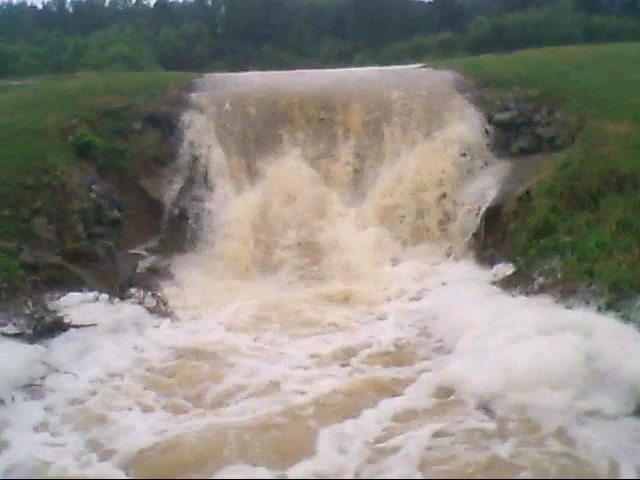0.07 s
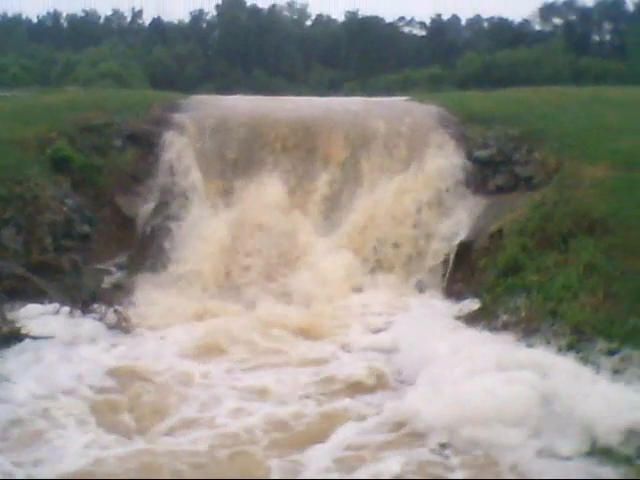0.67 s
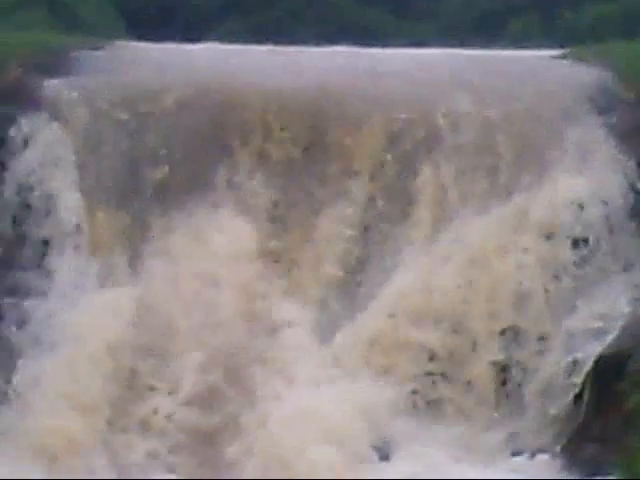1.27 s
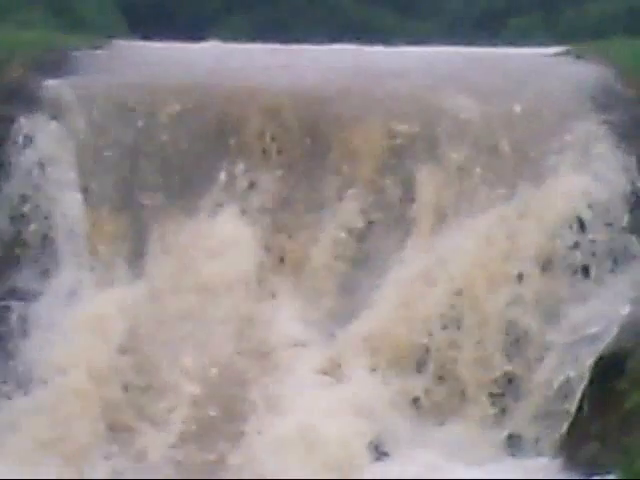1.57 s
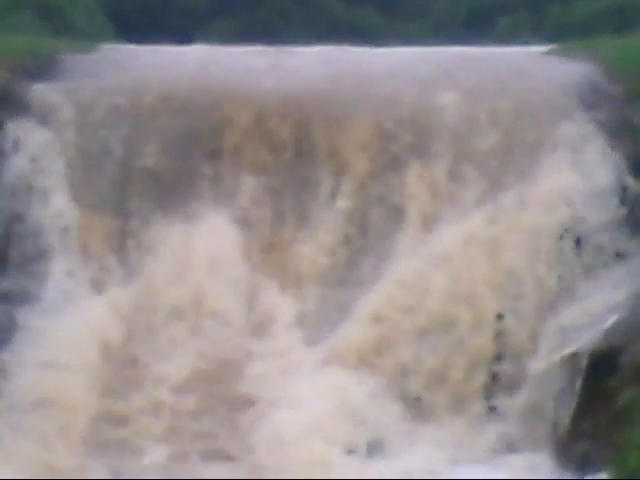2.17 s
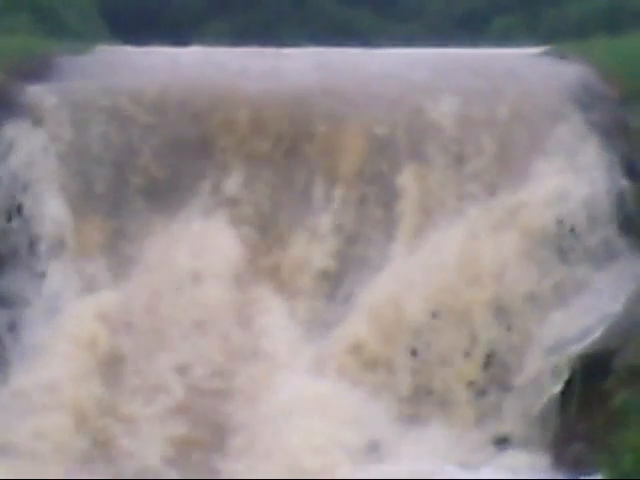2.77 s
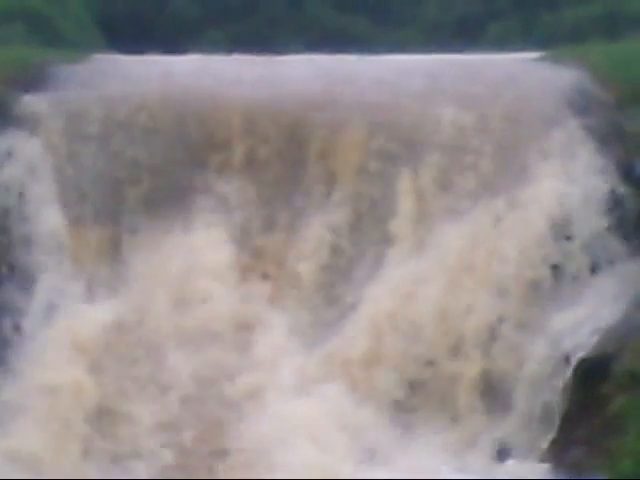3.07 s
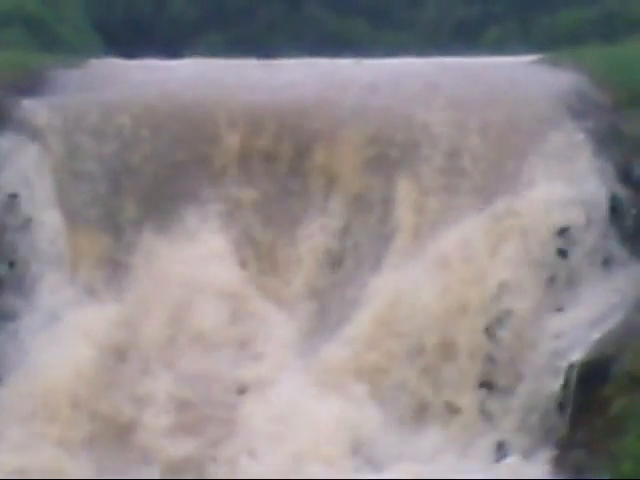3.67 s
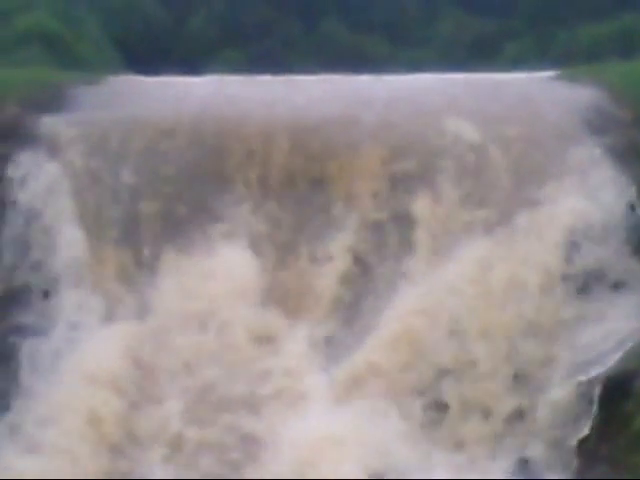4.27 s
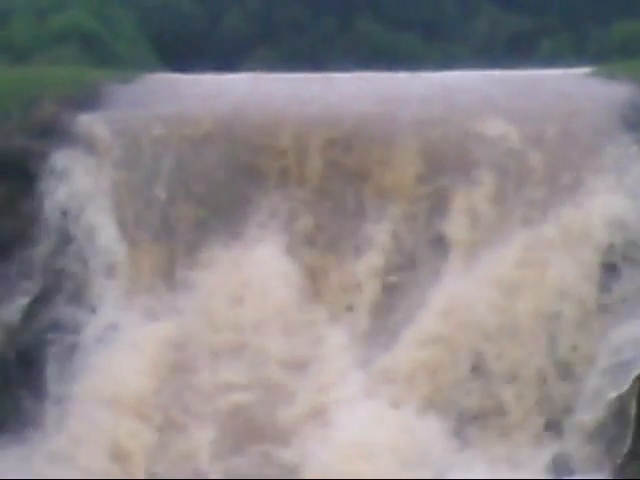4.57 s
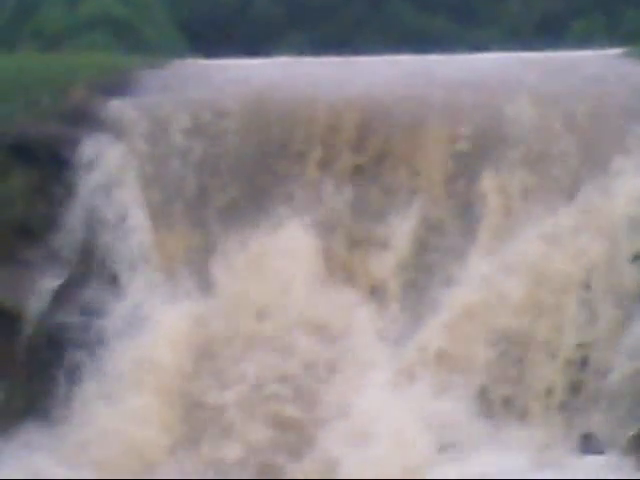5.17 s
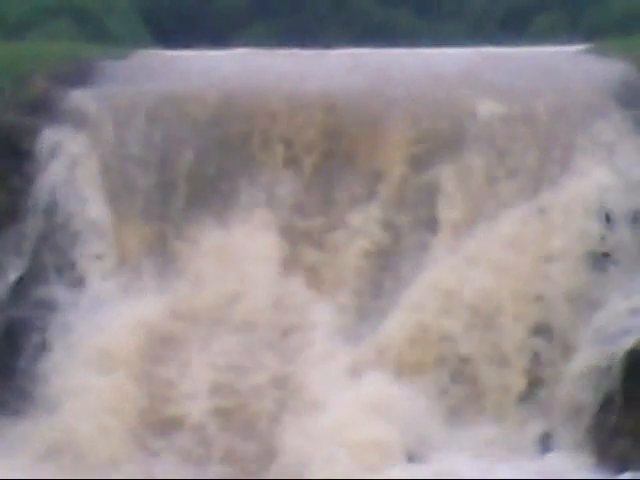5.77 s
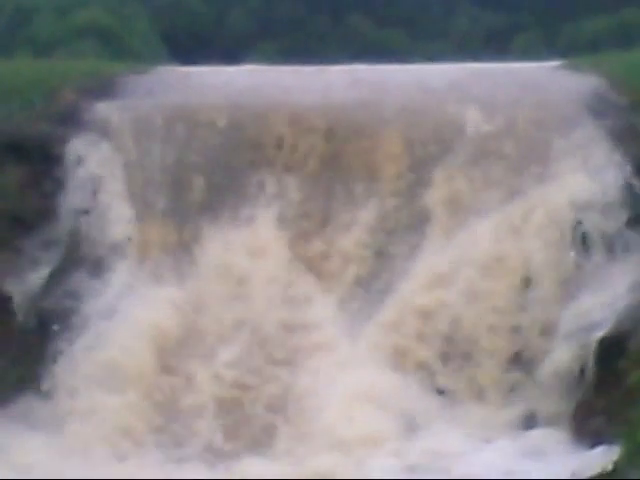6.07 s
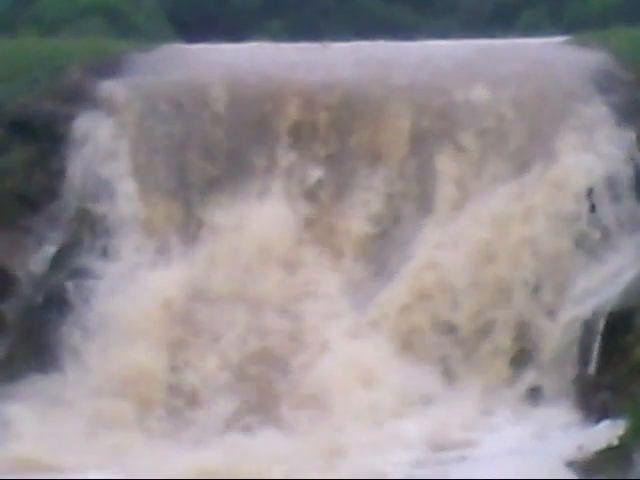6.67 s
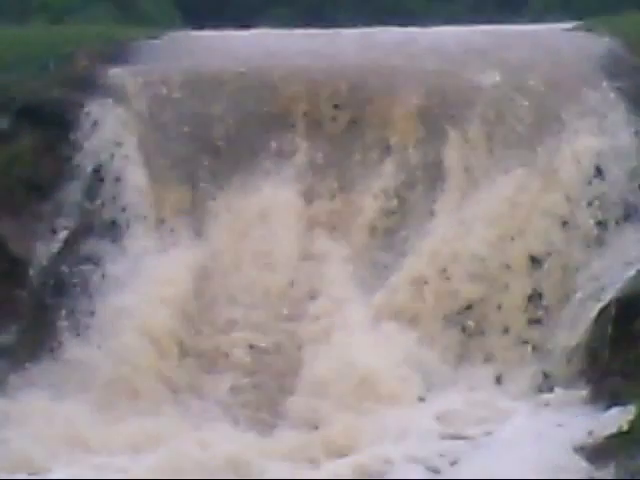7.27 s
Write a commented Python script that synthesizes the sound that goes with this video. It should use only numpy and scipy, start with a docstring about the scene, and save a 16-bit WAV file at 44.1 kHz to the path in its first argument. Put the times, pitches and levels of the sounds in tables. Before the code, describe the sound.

Floodwater crashes into a pool with a gritty roar, then drops into a deep, slowed-down rumble with soft gulps.

```python
"""Floodwater over a ledge

Muddy water crashes into a pool: countless impacts superpose into a roar, with a few surges, gulps
and ticks. The roar is heard at natural speed, then, after a second of overlap, at quarter speed as a
deep rumble. Both are coarsely sampled; the steps of the wave add a grit that follows every surge."""
import sys
import numpy as np
from scipy import signal
from scipy.fft import rfft, irfft
from scipy.io import wavfile
from scipy.ndimage import uniform_filter1d

SR = 44100
rng = np.random.default_rng(int(sys.argv[2]) if len(sys.argv) > 2 else 0)


def master_out(mix):
    """Clip the mix to full scale and print it as 16-bit PCM to the path in sys.argv[1]."""
    frames = np.transpose(np.atleast_2d(mix))
    ceiling = np.clip(frames, -1, 1)
    pcm = np.round(ceiling * 32767).astype(np.int16)
    wavfile.write(sys.argv[1], SR, pcm)


N = 331191
TIME = np.arange(N) / SR
RUMBLE_START_S, ROAR_END_S = 1.128, 2.165


def from_db(db):
    """Amplitude ratio: a factor of ten for every 20 dB."""
    return 10 ** (np.asarray(db) / 20)


def unit_rms(x):
    """Normalisation to unit mean power."""
    return x / np.sqrt(np.mean(x ** 2) + 1e-20)


def envelope(rows):
    """Amplitude envelope, linear in decibels between (time [s], level [dB]) points."""
    return from_db(np.interp(TIME, *np.transpose(rows)))


def colour(x, spectrum):
    """Spectral shaping: 6 dB per octave roll-off below the first point, a stop band above the last."""
    hz, db = np.transpose(spectrum)
    bin_hz = np.maximum(np.arange(N // 2 + 1) * SR / N, 1e-3)
    gain = from_db(np.interp(np.log(bin_hz), np.log(hz), db, right=-90))
    bass_rolloff = np.minimum(bin_hz / hz[0], 1)
    return irfft(rfft(x) * gain * bass_rolloff, N)


def drift(corner_hz):
    """Two-pole low-pass filtering turns white noise into a slow wander of unit power."""
    hop, settling = 40, 2000
    pole = np.exp(-2 * np.pi * corner_hz * hop / SR)
    noise = rng.standard_normal(N // hop + settling + 2)
    slow = signal.lfilter([1], [1, -2 * pole, pole * pole], noise)[settling:]
    return np.interp(np.arange(N) / hop, np.arange(len(slow)), unit_rms(slow))


def crashing_water(spectrum, impacts_per_s, churn_db, churn_hz, steady_s, size_spread_db=2.0):
    """Shot noise: random impacts, swelling in clumps, merge into a rush held at even mean power."""
    hits = rng.random(N) < impacts_per_s / SR
    signs = rng.choice([-1, 1], N)
    sizes = from_db(size_spread_db * np.clip(rng.standard_normal(N), -2, 2))
    churn = from_db(churn_db * drift(churn_hz))
    water = colour(hits * signs * sizes * churn, spectrum)
    window = int(steady_s * SR)
    power = uniform_filter1d(uniform_filter1d(water ** 2, window), window)
    return water / np.sqrt(power + 1e-12)


def sample_and_hold(x, slowdown=1, natural_rate_hz=8000):
    """Zero-order hold: a staircase wave adds gritty spectral images; slowing widens its steps."""
    natural_sample = np.arange(N) // slowdown
    step = np.floor(natural_sample * natural_rate_hz / SR)
    return np.interp(step * slowdown * SR / natural_rate_hz, np.arange(N), x)


# Spectrum of the roar before its glide: (frequency [Hz], relative density [dB])
ROAR_SPECTRUM = [(40, -32), (109, -20), (190, -10.0), (326, -13.5), (474, -10.5), (695, -0.5), (845, -0.2),
                 (966, -9), (1177, -1), (1464, -10.5), (2008, -20), (2925, -16), (3661, -18.5),
                 (4000, -30.5)]
# Upward slide of that spectrum: (time [s], frequency ratio [1])
ROAR_FREQUENCY_RATIO = [(0, 0.93), (.3, 0.97), (2.16, 1.04)]
# Strength of the fall at natural speed: (time [s], level [dB])
ROAR_LEVEL = [(0, -26.7), (.8, -25.5), (2.16, -25.5)]


def roar():
    """Superposed impacts make a bright rush; time scaling slides its spectrum upward a little."""
    water = crashing_water(ROAR_SPECTRUM, impacts_per_s=20000, churn_db=1.0, churn_hz=38, steady_s=0.073)
    position = np.cumsum(np.interp(TIME, *np.transpose(ROAR_FREQUENCY_RATIO)))
    gliding = np.interp(position, np.arange(N), water)
    return sample_and_hold(gliding * envelope(ROAR_LEVEL)) * (TIME < ROAR_END_S)


# Spectrum of the hiss under the roar: (frequency [Hz], relative density [dB])
HISS_SPECTRUM = [(200, -14), (1500, 3), (5000, -5), (16000, -16)]
# Spectrum of the noise floor: (frequency [Hz], relative density [dB])
FLOOR_SPECTRUM = [(2000, 0), (5000, -1), (16000, -9)]


def hiss(under_roar_db=-49.5, floor_db=-53):
    """Filtered Gaussian noise: one faint hiss ends with the roar, a brighter one lasts throughout."""
    under_roar = from_db(under_roar_db) * unit_rms(colour(rng.standard_normal(N), HISS_SPECTRUM))
    floor = from_db(floor_db) * unit_rms(colour(rng.standard_normal(N), FLOOR_SPECTRUM))
    return under_roar * (TIME < ROAR_END_S) + floor


# Sharp ticks in the water noise: (time [s], peak level [dB], width [s])
TICK_PULSES = [(0.0847, -14.5, 0.0002), (.151, -12, .00016), (.985, -18, 0.00017), (3.3597, -16, 0.00073),
               (3.6962, -13, 0.00094), (4.0256, -10, 0.00029), (4.289, -14, 0.00086),
               (5.755, -14.5, 0.00058)]


def ticks():
    """Rectangular pulses: bandwidth varies inversely with width, so the wider ones sound like knocks."""
    return sum(from_db(db) * ((TIME >= s) & (TIME < s + width)) for s, db, width in TICK_PULSES)


def swells(rows, half_width_s):
    """Gaussian bumps in decibels, each falling to 1/e of its height one half-width from its centre."""
    return sum(db * np.exp(-((TIME - s) / half_width_s) ** 2) for s, db in rows)


# Spectrum of the slowed fall: (frequency [Hz], relative density [dB])
RUMBLE_SPECTRUM = [(20, -25), (83, -6.5), (135, -6.5), (160, -11.5), (211, 0.5), (285, -0.64), (336, -12.5),
                   (402, -9.5), (463, -23), (520, -16), (609, -20.5), (730, -16), (886, -16), (1000, -29.5)]
# Strength of the slowed fall: (time [s], level [dB])
RUMBLE_LEVEL = [(1.13, -23), (1.8, -22.3), (2.6, -22.5), (3.3, -23), (3.6, -23), (4.1, -23), (4.7, -22.5),
                (6.2, -22.6), (7.51, -23.5)]
# Brief swells in the rumble's loudness: (time [s], rise [dB])
RUMBLE_SURGES = [(1.3, 2.5), (1.4, 1), (2.293, 1), (2.45, 1.5), (3.746, 3), (3.978, 3), (5.084, 3),
                 (5.49, 1.5), (6.045, 0.5), (6.555, 2.5), (7.22, 2)]
# Brief dips in the rumble's loudness: (time [s], drop [dB])
RUMBLE_LULLS = [(2.36, 2.5), (2.74, 2), (2.96, 2.5), (3.55, 3.5), (3.62, 2.5), (3.8, 5), (5.27, 2.5),
                (7.12, 3)]


def rumble():
    """Time dilation: at quarter speed the fall lies two octaves lower; surges and gulps stand out."""
    water = crashing_water(RUMBLE_SPECTRUM, impacts_per_s=12000, churn_db=0.5, churn_hz=14,
                           steady_s=0.11)
    swell_db = swells(RUMBLE_SURGES, half_width_s=0.018) - swells(RUMBLE_LULLS, half_width_s=0.023)
    surging = water * envelope(RUMBLE_LEVEL) * from_db(swell_db)
    return sample_and_hold(surging + gulps(), slowdown=4) * (TIME > RUMBLE_START_S)


# Short, low, gulp-like pitched swells in the rumble: (time [s], peak level [dB], frequency [Hz])
GULP_TONES = [(1.133, -15.5, 235), (2.276, -19, 260), (2.828, -16, 234), (3.456, -14, 221),
              (3.737, -14, 296), (5.751, -19, 369), (6.021, -12, 262)]


def gulps(t60_s=0.049, rise_s=0.0089):
    """Damped sinusoids: each gulp-like tone swells into a short ring that decays exponentially."""
    out = np.zeros(N)
    t = np.arange(SR // 8) / SR
    ring = from_db(-60 * t / t60_s) * (1 - np.exp(-t / rise_s)) ** 2
    ring /= ring.max()
    for s, db, hz in GULP_TONES:
        start = int(s * SR)
        out[start:start + len(t)] += from_db(db) * ring * np.sin(2 * np.pi * hz * t)
    return out


def scene():
    """Linear superposition of all sources in one channel."""
    return (roar() + rumble() + ticks() + hiss())[None]


def record(dry):
    """Band limiting: a steep elliptic low-pass filter removes the highest treble."""
    cutoff_hz = 15400
    lowpass = signal.ellip(12, .1, 90, cutoff_hz, fs=SR, output="sos")
    return signal.sosfilt(lowpass, dry)


dry = scene()
out = record(dry)
master_out(out)
```